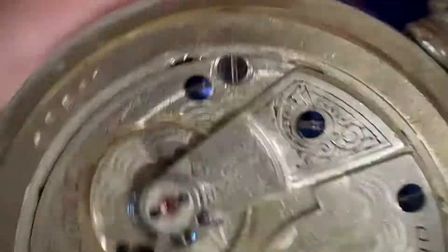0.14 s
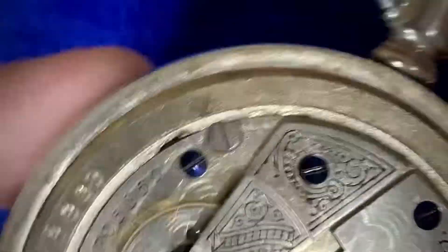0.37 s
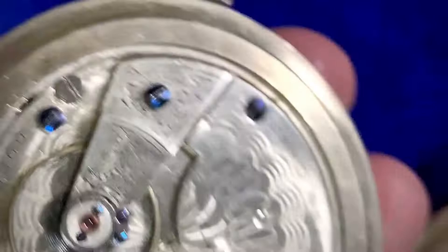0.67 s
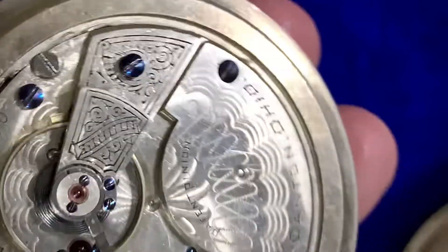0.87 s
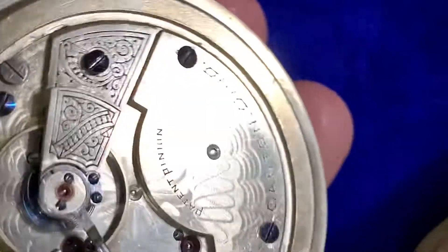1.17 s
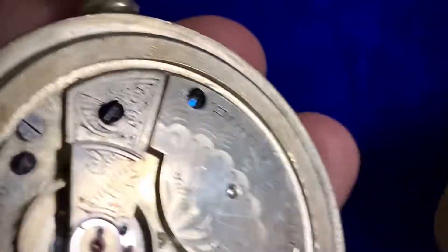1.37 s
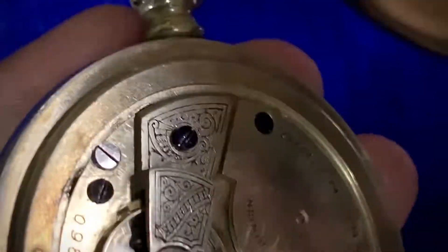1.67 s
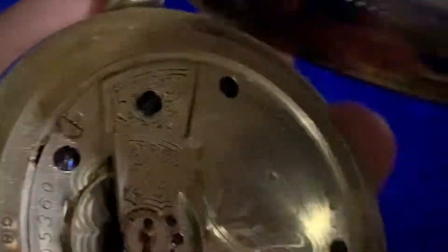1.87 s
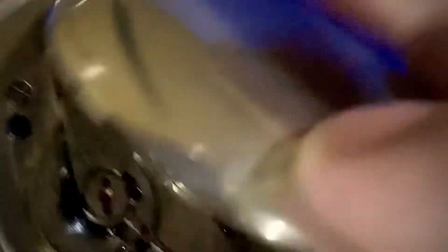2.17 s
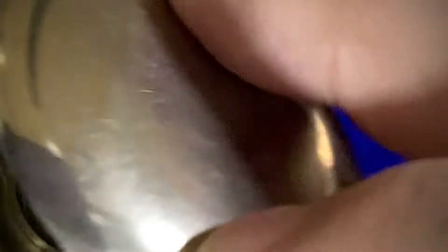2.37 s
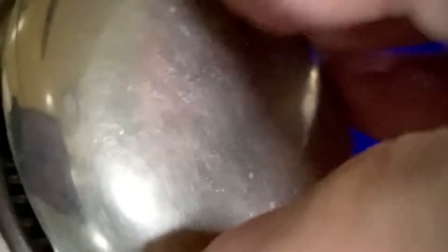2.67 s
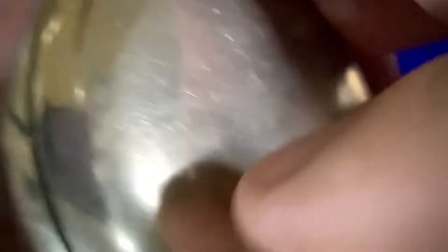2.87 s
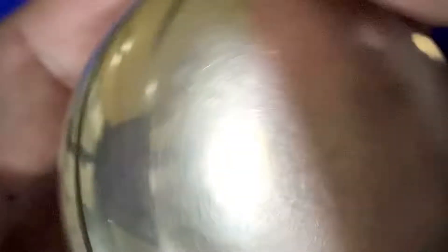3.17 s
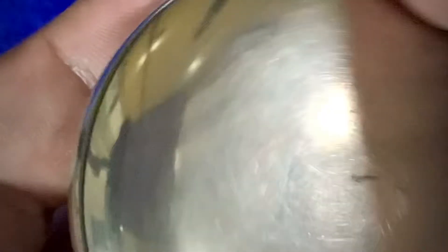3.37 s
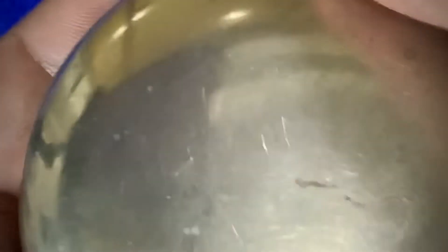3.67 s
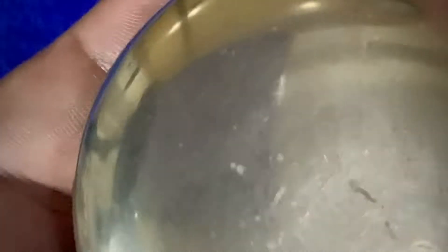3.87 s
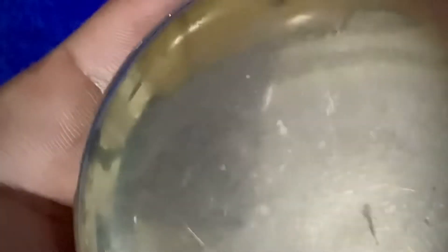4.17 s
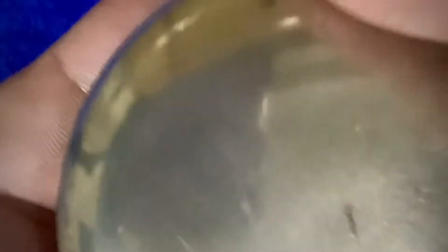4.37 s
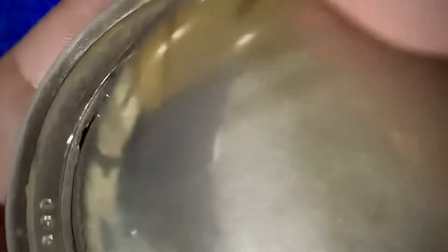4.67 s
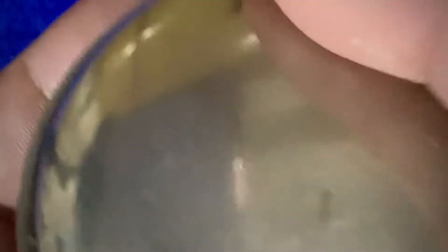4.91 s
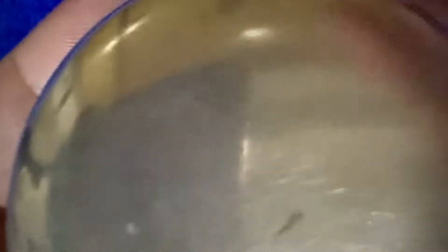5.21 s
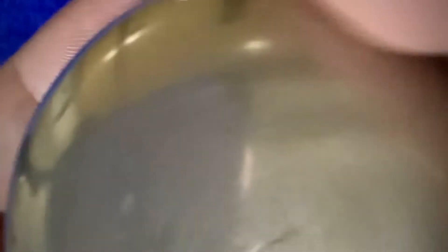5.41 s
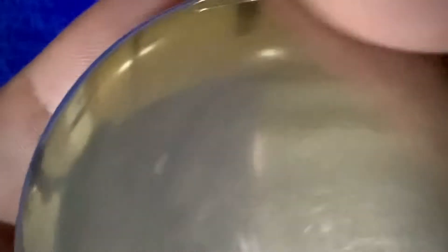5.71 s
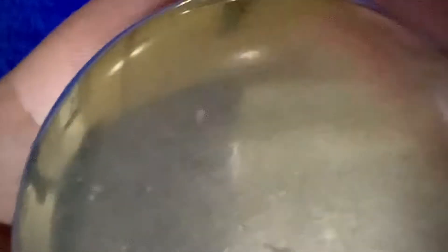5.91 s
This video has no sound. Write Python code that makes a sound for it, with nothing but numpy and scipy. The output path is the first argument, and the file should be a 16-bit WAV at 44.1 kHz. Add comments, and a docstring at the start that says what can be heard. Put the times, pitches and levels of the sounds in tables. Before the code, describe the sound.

A pocket watch ticks faintly and evenly while its metal covers are pressed shut with sharp clicks, small scrapes and snaps.

```python
"""Closing a ticking pocket watch

An open pocket watch ticks five times a second, close to the microphone in a quiet room.
Fingers swing its metal covers shut and press them home: the rims click, scrape and snap,
and the case rings briefly, damped by the hand that holds it. Clicks and scrapes are
filtered noise; the ringing metal is a set of fading sine waves."""
import sys
import numpy as np
from scipy import signal
from scipy.fft import rfft, irfft
from scipy.io import wavfile
from scipy.ndimage import uniform_filter1d

SR = 44100
rng = np.random.default_rng(int(sys.argv[2]) if len(sys.argv) > 2 else 0)


def int16_out(signal):
    """Quantize to a 16-bit WAV file."""
    q = np.round(np.clip(np.atleast_2d(signal).T, -1, 1) * 32767)
    wavfile.write(sys.argv[1], SR, q.astype(np.int16))


N = 266805

# each time a cover meets its rim; knock and ring are relative to the level:
# (time [s], level [dB], knock [dB], brightness [dB], ring [dB], sliding time [s])
COVER_HITS = [(1.786, -23, -14.5, -8.5, -7, 0.00085), (1.8014, -33, -18, -19.5, -4, .0014),
              (2.045, -44.5, -19, -15.5, -0.5, .002), (2.557, -15.5, -33, 3.5, -6.5, .006),
              (2.733, -43.5, -12.5, -13.5, -6.5, 0.0024), (2.7506, -12, -23.5, 4, -9.5, .003),
              (2.792, -19.5, -17.5, 7.5, -13, .007), (3.194, -33, -10, -8.5, -21.5, .002),
              (3.704, -26.5, -6.5, 0.5, -9, .003), (3.731, -24, -17, 2.5, -10, .02),
              (4.03, -43, -4, -3, -12, .014), (4.096, -39.5, -16.5, -4, -10, .0015),
              (4.1264, -21.5, -16, 5.5, -3, .016), (4.3465, -14.5, -5.5, -2, -18, 0.00053),
              (4.397, -27.5, -6.5, -6, -14, .0065), (4.411, -25.5, -16, -6.5, -1.5, .01),
              (4.48, -16, -21, 5.5, -2, 0.004), (4.487, -10.5, -42.5, -1.5, -3, 0.0055),
              (4.498, -20, -47, 9.5, 1.5, 0.0052), (4.543, -25.5, -40, -3, 5, .01),
              (4.577, -36, -33.5, -15.5, -32.5, .01), (4.74, -33, -43, -1.5, -11, .002),
              (4.754, -28, -38.5, -23, 0, .026), (4.7678, -10.5, -39.5, 6, -25, 0.0017),
              (4.914, -31, -18.5, -0.5, -13, .004), (4.931, -25, -17.5, -2, -27, 0.011),
              (4.941, -17, -23.5, 5.5, -14, 0.0033), (5.101, -34.5, -6.5, -4, -4.5, .003),
              (5.118, -26, -17, 3, -28.5, .002), (5.369, -34, -12, -5.5, -14, .004),
              (5.425, -30, -9.5, -3, -26, .0023)]
# the notes the metal case rings at: (frequency [Hz], level [dB], time to fade by 60 dB [s])
CASE_NOTES = [(1798, -21, .04), (2331, -18, .04), (3010, -15, .07), (4598, -15, .08), (4865, -9, .07),
              (4972, -4, .085), (5750, -23, .08), (7251, -18, .1), (7411, -.5, .1), (8700, -20, .08),
              (9243, -18, .08), (9790, -20, .08), (10140, -16, .05), (10586, -2, .11), (10702, -5, .09),
              (11730, -5, .07), (11850, -9, .06), (12261, -14, .07), (14445, -13, .16), (14630, -15, .08)]
# the tone of rubbing on metal: (frequency [Hz], level [dB])
RUB_TONE = [(200, -21.5), (900, 2), (2300, -1), (3200, -5.5), (4500, -2), (6200, -0.5), (9000, -9),
            (10700, -6), (12000, -16.5), (13700, -6), (14900, -5.5), (15400, -25)]
# how alike left and right are for the nearby watch: (frequency [Hz], likeness [0 to 1])
WATCH_LIKENESS = [(200, 1), (700, 1), (1400, 0.025), (3000, 0.21), (5000, 0), (7500, 0.84), (11000, 0.96),
                  (15000, 0.069)]
SHUT_S = 2.9  # from here on the cover lies against its rim


def amp(db):
    """Turns decibels into a gain to multiply by."""
    return 10 ** (np.asarray(db) / 20)


def rms(x):
    """The average strength of a signal (root mean square)."""
    return np.sqrt(np.mean(x ** 2) + 1e-20)


def look_up(table, hz):
    """A table's value at a frequency, blending between rows on a log scale."""
    row_hz, value = np.transpose(table)
    return np.interp(np.log(hz + 1), np.log(row_hz + 1), value)


def follow(curve):
    """Turns a level curve into a gain for every sample."""
    return amp(np.interp(np.arange(N) / SR, *np.transpose(curve)))


def add(mix, s, sound):
    """Mixes a stereo sound in, starting at s seconds."""
    part = mix[:, max(round(s * SR), 0):][:, :sound.shape[1]]
    part += sound[:, :part.shape[1]]


def stereo_noise(likeness, size):
    """White noise in two channels, as alike as the table says."""
    common, separate = rfft(rng.standard_normal((2, size)))
    alike = np.clip(look_up(likeness, np.fft.rfftfreq(size, 1 / SR)), -1, 1)
    return irfft(np.array([common, alike * common + np.sqrt(1 - alike ** 2) * separate]), size)


def treble(hz):
    """The tilt of a harder hit: -1 for low and middle frequencies, rising to +1 at the top."""
    return look_up([(4500, -1.0), (11000, 1.0)], hz)


def colour(x, tone, bright_db=0, patchy_db=0, size=2048):
    """Filters a sound to a tone; random peaks and dips give each point of contact its own colour."""
    hz = np.fft.rfftfreq(size, 1 / SR)
    patches = uniform_filter1d(uniform_filter1d(rng.standard_normal(len(hz)), size=10), size=7)
    patches = np.minimum(patches / rms(patches), 1.5)
    log_gain = np.log(amp(look_up(tone, hz) + bright_db * treble(hz) + patchy_db * patches))
    # a minimum-phase filter, so nothing sounds ahead of a hit
    spectrum = np.exp(signal.hilbert(np.r_[log_gain, log_gain[-2:0:-1]]).conj())
    response = np.fft.ifft(spectrum).real
    return signal.oaconvolve(x, response[None], axes=1)[:, :x.shape[1]]


def resonate(x, hz, width_hz):
    """A resonance: lets through a band around one frequency."""
    hz = min(hz, SR / 2 - 1)
    return signal.lfilter(*signal.iirpeak(hz, hz / width_hz, fs=SR), x)


def wander(x, depth_db):
    """Lets the tone drift in patches of a few hundred hertz and a few hundredths of a second."""
    bands = signal.stft(x, SR, nperseg=512)[2]
    patches = uniform_filter1d(rng.standard_normal(bands.shape[1:]), size=6, axis=0)
    patches = uniform_filter1d(patches, size=12, axis=1)
    drifting = signal.istft(bands * amp(depth_db * patches / rms(patches)), SR, nperseg=512)[1][:, :N]
    return drifting * rms(x) / rms(drifting)


def burst(slide_s, t60, size, grain_db=3, catches_per_s=2500):
    """Two sliding surfaces catch in tiny impacts; each is noise that fades 60 dB in t60 seconds."""
    sliding = np.arange(size) / SR < slide_s
    strength = amp(grain_db * rng.standard_normal(size)) ** 2
    catches = strength * (rng.random(size) < catches_per_s / SR) * sliding
    catches[0] += .5 + 12 * np.exp(-slide_s / 0.001)  # a short touch puts its force in the first one
    power = signal.lfilter([1], [1, -amp(-120 / (t60 * SR))], catches)
    return stereo_noise(WATCH_LIKENESS, size) * np.sqrt(power)


def ring(notes, size, bright_db=0, damping=1):
    """A struck object rings as fading sine waves, each a little out of step between left and right."""
    hz, db, t60 = np.transpose(notes)[:, :, None]
    t = np.arange(size) / SR
    phase, side = rng.uniform(0, 2 * np.pi, hz.shape), rng.choice([-1, 1], hz.shape)
    apart = side * np.arccos(np.clip(look_up(WATCH_LIKENESS, hz), -1, 1)) / 2
    height = amp(db + bright_db * treble(hz) + 2 * rng.standard_normal(hz.shape))
    attack = 1 - np.exp(-t * hz / 2)
    envelope = height / np.linalg.norm(height) * amp(-60 * t * damping / t60) * attack
    angle = 2 * np.pi * hz * t + phase
    return np.sqrt(2) * np.array([(envelope * np.sin(angle + k * apart)).sum(0) for k in (1, -1)])


def background(rumble_trim_db=4, hiss_db=-75, hum_hz=61, hum_trim_db=-1):
    """The quiet room: a low rumble, a wavering hum and a faint, drifting hiss."""
    # the tones of the rumble and the hiss: (frequency [Hz], level [dB])
    rumble_tone = [(12, -59.5), (20, -37.5), (30, -19.5), (40, -11), (64, 1.5), (141, -4.5), (199, -5.5),
                   (236, -8), (305, -1), (368, -12.5), (452, -13.5), (536, -20), (706, -15), (882, -26.5),
                   (1200, -36.5), (1560, -58.5), (2640, -120)]
    hiss_tone = [(400, -12.5), (700, -9), (1100, -4.5), (2400, -5), (5500, -12), (7200, -10), (11000, -13),
                 (13000, -19.5), (14600, -19.5), (15300, -35)]
    # how the rumble and the hum rise and fall, before their trims: (time [s], level [dB])
    rumble_levels = [(0.0, -66.5), (0.29, -61.5), (2.65, -67.5), (2.91, -78), (3.4, -69), (3.98, -74.5),
                     (4.36, -63), (5.04, -77), (5.68, -73.5), (6.05, -60.5)]
    hum_levels = [(0, -64), (.7, -59.5), (1.7, -68), (2.8, -57.5), (3.1, -63.5), (3.95, -63), (4.27, -55),
                  (4.6, -65), (5.5, -65), (6.05, -61)]
    # how alike left and right are for room noise: (frequency [Hz], likeness [0 to 1])
    likeness = [(60, 0.9), (300, 0.91), (640, 0), (1400, 0), (3100, 0.087), (7000, .3), (15000, 1)]
    rumble = colour(stereo_noise(likeness, N), rumble_tone, size=8192)
    hiss = colour(stereo_noise(likeness, N), hiss_tone)
    low_cut = signal.butter(2, 42, "high", fs=SR, output="sos")
    rumble = signal.sosfilt(low_cut, wander(rumble, depth_db=2.5))
    hum = resonate(stereo_noise(likeness, N), hum_hz, width_hz=20)
    hum = resonate(hum, hum_hz, width_hz=20)
    hiss = wander(hiss, depth_db=3.5)
    return (amp(rumble_trim_db) * follow(rumble_levels) * rumble / rms(rumble)
            + amp(hiss_db) * hiss / rms(hiss)
            + amp(hum_trim_db) * follow(hum_levels) * hum / rms(hum))


def room_echo(x):
    """The room's echoes blur into a short tail, each band fading at its own speed."""
    # how long the room rings: (frequency [Hz], time to fade by 60 dB [s])
    fade_times = [(300, 0.1), (1400, 0.24), (3500, 0.26), (8000, 0.38), (15000, 0.047)]
    # the tone of the echo: (frequency [Hz], level [dB])
    tone = [(300, -4.5), (1100, 5.5), (1700, 2.0), (4000, -1.5), (6000, -5.5), (7400, -4.5),
            (9000, -0.5), (10600, -6), (14600, 2.5), (15600, -22)]
    hz, t, bands = signal.stft(rng.standard_normal((2, SR * 3 // 4)), SR, nperseg=256)
    envelope = amp(-60 * t / look_up(fade_times, hz)[:, None]) * (1 - np.exp(-t / 0.004))
    tail = signal.istft(bands * amp(look_up(tone, hz))[:, None] * envelope, SR, nperseg=256)[1]
    return signal.fftconvolve(x, tail / np.linalg.norm(tail[0]), axes=1)[:, :N]


def stroke(length_s, db, hz, width_hz):
    """One sliding stroke: a band of friction noise that swells and fades."""
    size = int(length_s * SR)
    band = resonate(stereo_noise(WATCH_LIKENESS, size), hz, width_hz)
    friction = colour(resonate(band, hz, width_hz), RUB_TONE, patchy_db=5.0)
    return amp(db) * friction / rms(friction) * np.sin(np.linspace(0, np.pi, size))


def hand(hollow_q=2.5, bump_s=.763, bump_db=-40.5):
    """Skin swishes over the metal, the cover drags with a hollow note, and once the hand bumps softly."""
    # skin slides over the case: (middle time [s], length [s], level [dB])
    swishes = [(.371, 0.013, -55.5), (.555, .3, -69), (.903, .097, -60.5), (1.901, .11, -61.5),
               (4.671, .21, -67), (5.945, 0.18, -65)]
    # the hollow under the dragged cover sounds: (middle time [s], length [s], level [dB], pitch [Hz])
    scrapes = [(2.192, 0.052, -61.5, 2370), (2.697, .12, -51, 2050), (2.899, .06, -68.5, 1670),
               (3.359, .12, -63, 1200), (4.053, .083, -63, 1350), (4.372, .08, -45, 870),
               (4.597, .077, -63, 1870), (4.822, .055, -48.5, 1900), (5.373, .068, -51.5, 1400)]
    # the low notes of the bump: (frequency [Hz], level [dB], time to fade by 60 dB [s])
    bump_notes = [(200, -1, .15), (250, -6, .08), (405, 0, .06), (460, -2, .05), (640, -12, .04),
                  (980, -15, .04)]
    out = np.zeros((2, N))
    for s, length_s, db in swishes:
        add(out, s - length_s / 2, stroke(length_s, db, hz=2500, width_hz=3000))
    for s, length_s, db, hz in scrapes:
        add(out, s - length_s / 2, stroke(length_s, db, hz, width_hz=hz / hollow_q))
    add(out, bump_s, amp(bump_db) * ring(bump_notes, size=8000))
    return out


def ticking(first_beat_s=.2024, beat_s=.19987, tick_db=-49.5, tock_db=-56.5, light_db=-54.5):
    """Two tiny catches (pallets) take turns striking; each beat is one sharp impact among light ones."""
    # the impacts in one beat: (time from the beat [s], relative level [dB])
    impacts = [(-.044, -15.5), (-.022, -15), (-.011, -9), (.0015, -2.5), (0.017, -20.5), (0.05, -17.5)]
    # the tone of one impact: (frequency [Hz], level [dB])
    tick_tone = [(500, -30), (2500, -29), (5000, -21.5), (6200, -15.5), (8000, -13), (11700, -12.5),
                 (12700, 2), (13500, -6), (14500, -18), (15500, -10.5), (16500, -20.5)]
    # notes of the plate holding the gears: (frequency [Hz], level [dB], time to fade by 60 dB [s])
    plate_notes = [(4850, -10, .05), (7380, -5, .06), (12680, -1, .03), (13520, 3, .045), (14380, -23, .6)]
    hairspring_note = [(2055, 0, 0.48)]  # same columns
    out = np.zeros((2, N))
    sharpest_db = max(db for delay, db in impacts)
    for k, s in enumerate(np.arange(first_beat_s, N / SR, beat_s)):
        db, bright_db = tick_db, 0
        if k % 2:  # the tock is early, softer and duller, and the hairspring pings faintly
            s, db, bright_db = s - .0018, tock_db, -3.5
            add(out, s, amp(-77.5) * ring(hairspring_note, size=24000))
        if s > SHUT_S:  # the shut cover softens the sharp impact; the tone turns a little brighter
            db, bright_db = db - 4, bright_db + 1.5
        for delay, impact_db in impacts:
            gain = amp((db if impact_db == sharpest_db else light_db) + impact_db)
            impact = burst(slide_s=.0018, t60=.017, size=4000)
            tick = colour(impact, tick_tone, bright_db - 2, patchy_db=7.5)
            add(out, s + delay, gain * tick / rms(tick[:, :SR // 400]))
            add(out, s + delay, gain * amp(-2) * ring(plate_notes, 12000, bright_db))
    return out


def rubbing_rims(grain_db=5.5, singing_db=13, chatter_t60=0.15, creak_t60=0.097, creak_db=5):
    """Once the cover moves, the rims drag on each other, more around each hit, and make the case sing."""
    # the rubbing as the fingers press: (time [s], level [dB])
    rub_levels = [(1.7, -68.5), (2.5, -76.5), (2.72, -56.5), (3.02, -73), (3.2, -61), (3.4, -63),
                  (3.62, -91), (3.95, -74.5), (4.08, -53.5), (4.28, -66.5), (4.45, -62.5), (4.88, -64),
                  (5.03, -49), (5.2, -71.5), (6.05, -71)]
    t = np.arange(N) / SR
    catches = uniform_filter1d(rng.standard_normal(N), size=500)
    drag = colour(stereo_noise(WATCH_LIKENESS, N) * amp(grain_db * catches / rms(catches)), RUB_TONE)
    singing = sum(amp(0.41 * db + 6 * treble(hz)) * resonate(drag, hz, width_hz=60)
                  for hz, db, _ in CASE_NOTES)
    drag = drag + amp(singing_db) * singing
    hits = np.zeros(N)
    for s, db, *_ in COVER_HITS:
        hits[round(s * SR)] = amp(-46.5 + 0.53 * db)  # harder hits leave louder chatter
    chatter = signal.lfilter([1], [1, -amp(-60 / (chatter_t60 * SR))], hits)
    # a fade run backwards: once the cover is shut, a creak builds up to each hit
    build_up = signal.lfilter([1], [1, -amp(-60 / (creak_t60 * SR))], hits[::-1])[::-1]
    creak = amp(creak_db) * build_up * (t > SHUT_S)
    pressing = follow(rub_levels) * (t > rub_levels[0][0])
    return np.hypot(pressing, chatter + creak) * wander(drag / rms(drag), depth_db=4)


def cover_hit(db, knock_db, bright_db, ring_db, slide_s, size=7000):
    """One hit is a short crack, a gritty click, a hollow knock of the shell and the ring of the case."""
    # the tones of the metal click and of the hollow shell: (frequency [Hz], level [dB])
    click_tone = [(150, -27), (900, -29.5), (1700, 1.5), (2400, 2), (3800, -3.5), (4900, 6), (6100, -6),
                  (7400, 0), (9500, -1), (12000, 6), (13400, -12), (14800, 7.5), (15400, -12.5),
                  (16500, -38)]
    knock_tone = [(60, -14.5), (200, -15.5), (450, -8.5), (600, -3.5), (800, 1.5), (980, 2.5), (1180, -9),
                  (1400, 2.5), (2000, -22.5), (5000, -42.5)]
    samples = np.arange(size)
    onset = int((slide_s + 0.0018) * SR)
    click = colour(burst(slide_s, t60=0.034, size=size), click_tone, bright_db, patchy_db=5.5)
    knock = colour(burst(slide_s, t60=0.041, size=size), knock_tone, patchy_db=-2.5)
    body = amp(-7.5) * click / rms(click[:, :onset]) + amp(knock_db - 5) * knock / rms(knock[:, :onset])
    build_up = np.minimum(samples / (onset / 3), 1)  # the ring grows while the rims touch
    body += amp(ring_db + 5) * build_up * ring(CASE_NOTES, size, bright_db / 2, damping=1.234)
    pressure = 1 - np.exp(-samples / SR / (slide_s * 0.17 + 1e-5))  # a long slide bites gradually
    crack = colour(burst(slide_s=0, t60=0.013, size=size), click_tone, 0.62 * bright_db, patchy_db=1.5)
    return amp(db) * (pressure * body + amp(-7.5) * crack / rms(crack[:, :SR // 500]))


def covers():
    """The covers strike their rims; fingertips add soft, dull, hollow taps."""
    # a fingertip taps the shut cover: (time [s], relative level [dB])
    taps = [(3.346, -45.5), (3.463, -50.5), (3.847, -44), (4.319, -44.5), (5.049, -46), (5.467, -52.5),
            (5.632, -49), (5.769, -56.5), (5.989, -51), (6.035, -47)]
    out = np.zeros((2, N))
    for s, *hit in COVER_HITS:
        add(out, s, cover_hit(*hit))
    for s, db in taps:
        add(out, s, cover_hit(db - 5.5, knock_db=4.5, bright_db=-10.5, ring_db=-10, slide_s=0.0017))
    return out


def scene():
    """The watch in the hand, a little to the right, with its echo and the room's own noise."""
    # how much louder the watch is on the right: (frequency [Hz], right minus left [dB])
    balance = [(400, -0.5), (1000, 1.5), (2500, 2.5), (5000, 2), (8000, -1), (15000, 0.5)]
    watch = covers() + rubbing_rims() + ticking() + hand()
    watch = watch + amp(-14) * wander(room_echo(watch), depth_db=3)
    right_db = look_up(balance, np.fft.rfftfreq(N, 1 / SR))
    placed = irfft(rfft(watch) * amp(np.array([-right_db, right_db]) / 2), N)
    return placed + background()


def record(dry, ceiling=.85, cutoff_hz=16500):
    """The recorder rounds off the loudest snap and cuts the highest treble."""
    rounded = ceiling * np.tanh(dry / ceiling)
    low_pass = signal.firwin(255, cutoff_hz, window=("kaiser", 9), fs=SR)
    return signal.oaconvolve(rounded, low_pass[None], "same")


dry = scene()
out = record(dry)
int16_out(out)
```